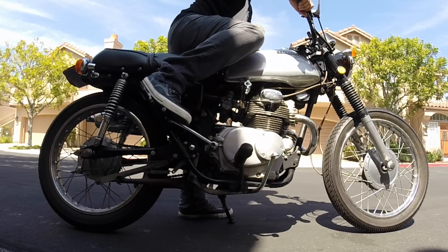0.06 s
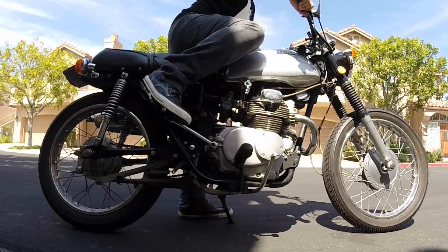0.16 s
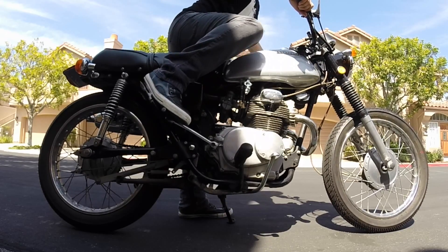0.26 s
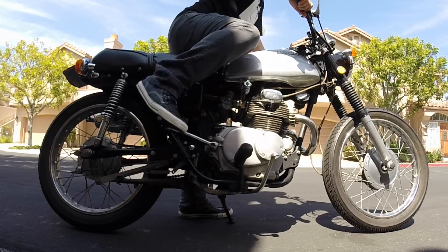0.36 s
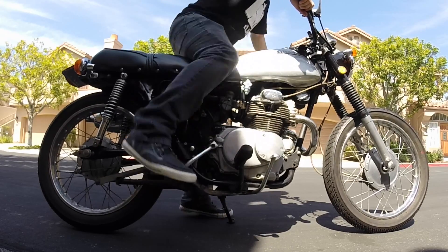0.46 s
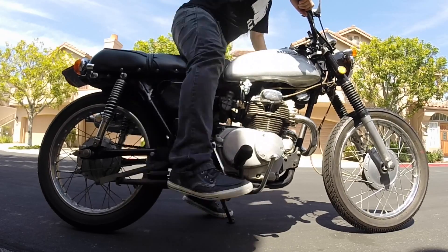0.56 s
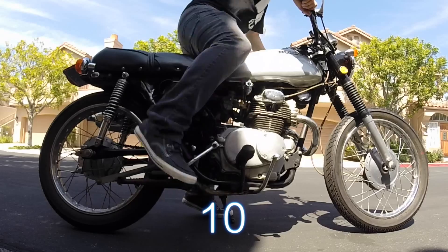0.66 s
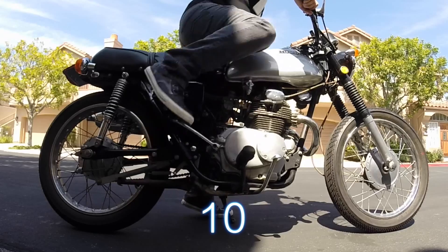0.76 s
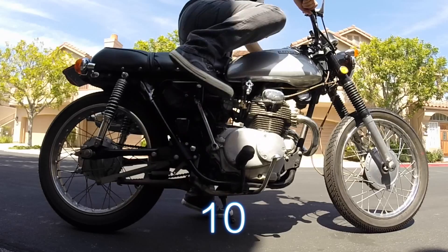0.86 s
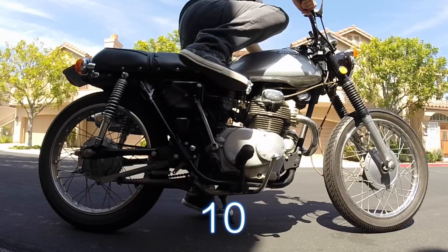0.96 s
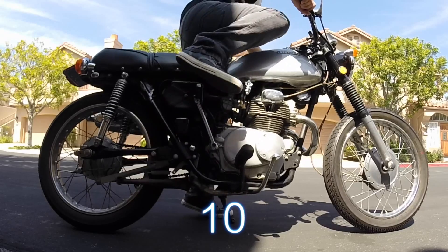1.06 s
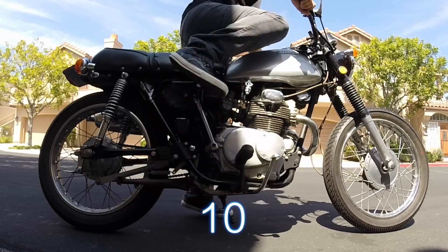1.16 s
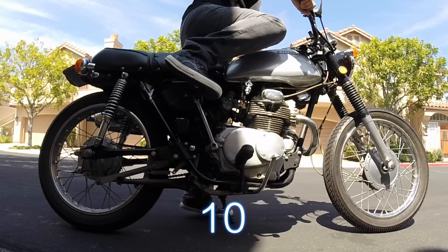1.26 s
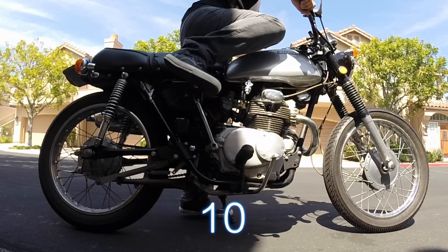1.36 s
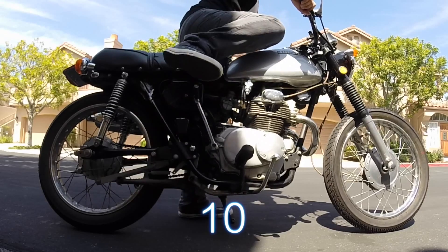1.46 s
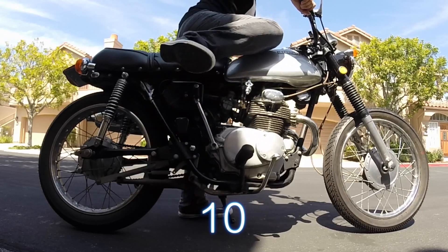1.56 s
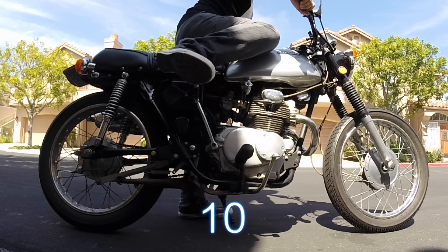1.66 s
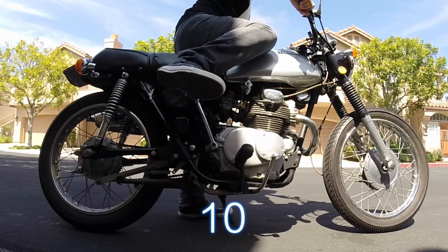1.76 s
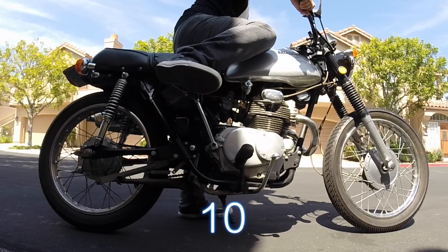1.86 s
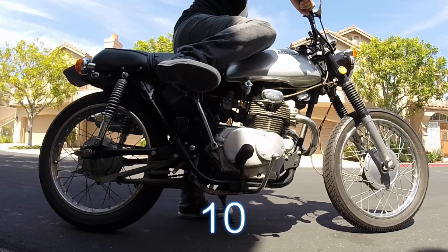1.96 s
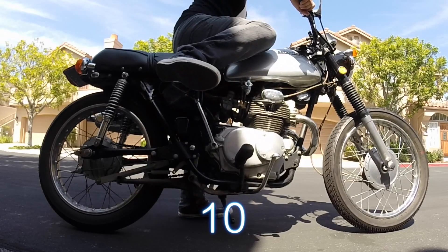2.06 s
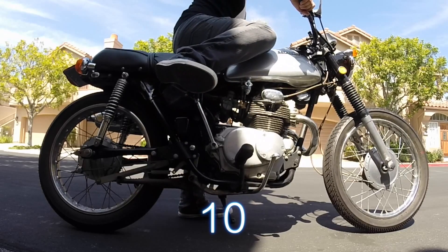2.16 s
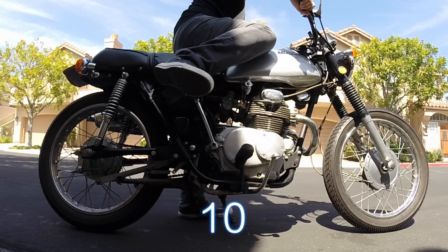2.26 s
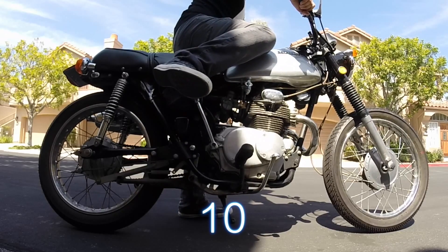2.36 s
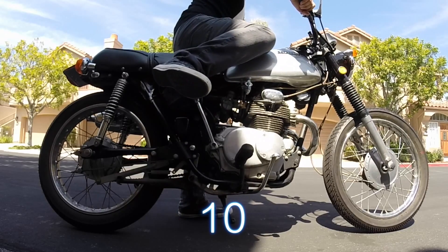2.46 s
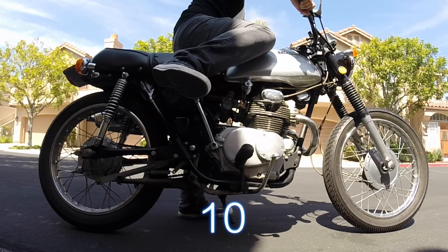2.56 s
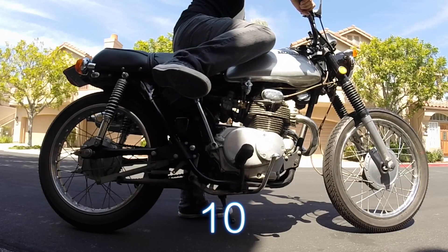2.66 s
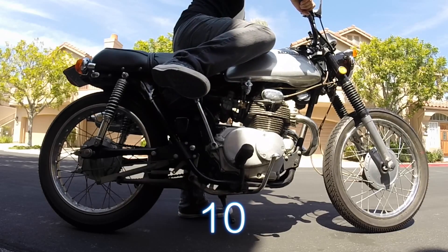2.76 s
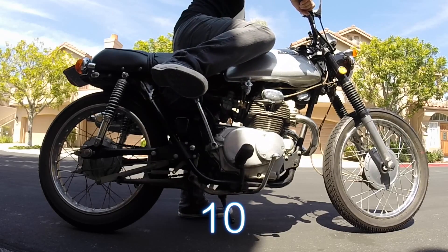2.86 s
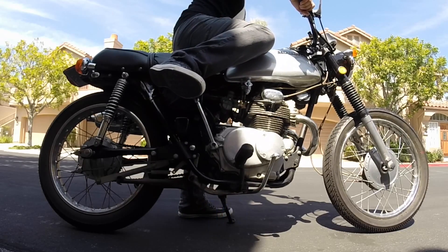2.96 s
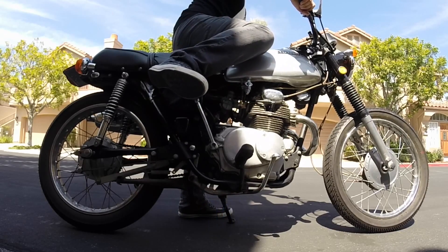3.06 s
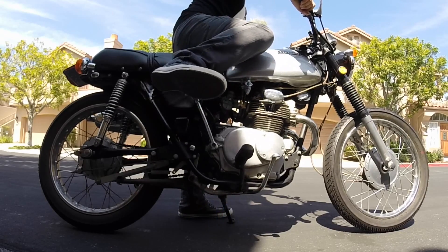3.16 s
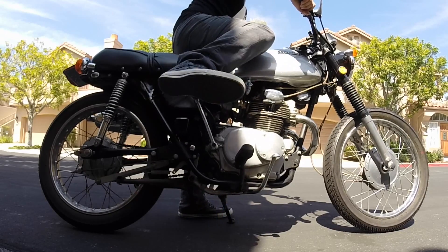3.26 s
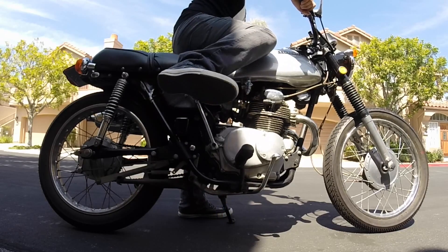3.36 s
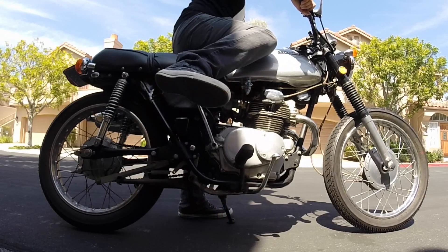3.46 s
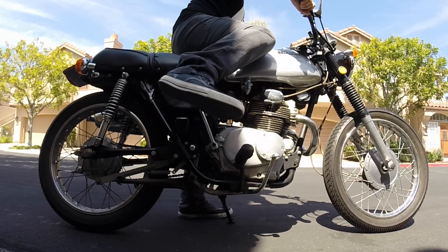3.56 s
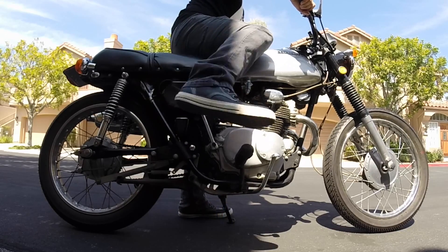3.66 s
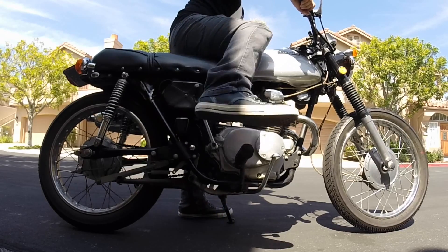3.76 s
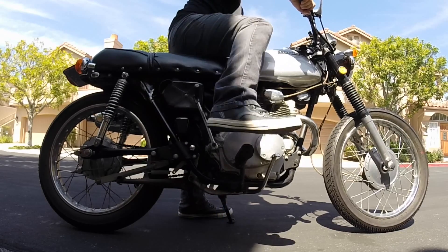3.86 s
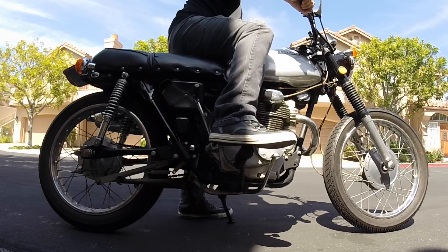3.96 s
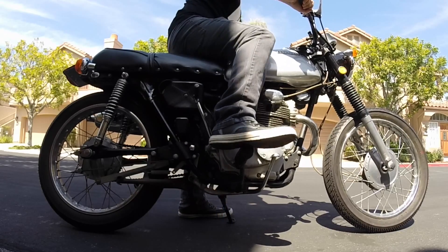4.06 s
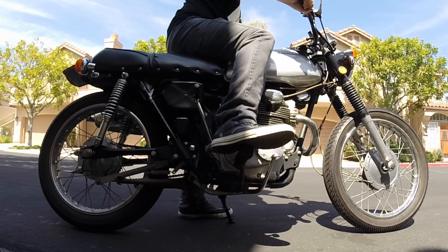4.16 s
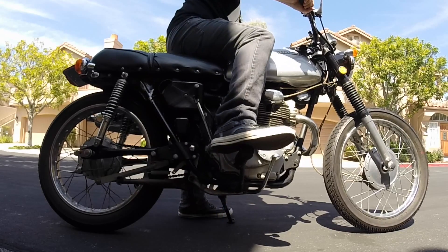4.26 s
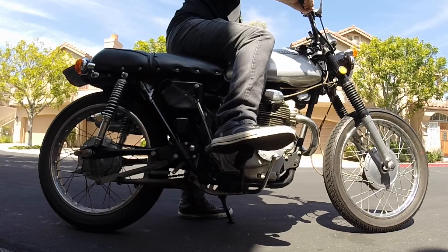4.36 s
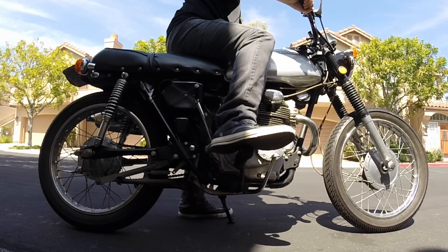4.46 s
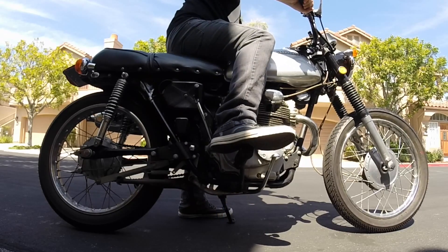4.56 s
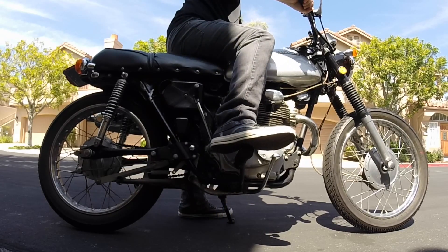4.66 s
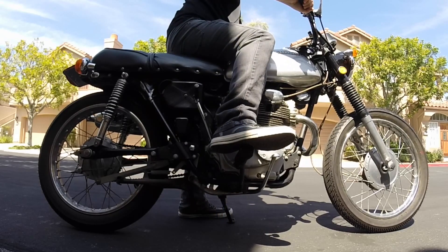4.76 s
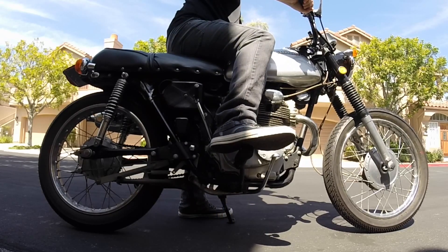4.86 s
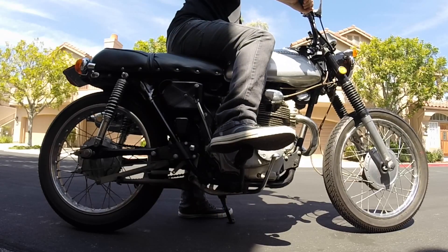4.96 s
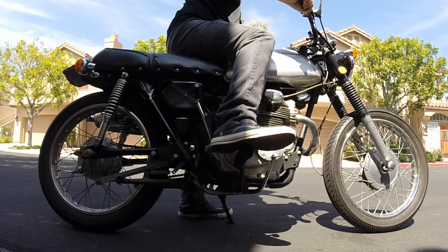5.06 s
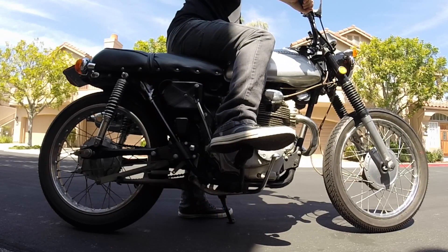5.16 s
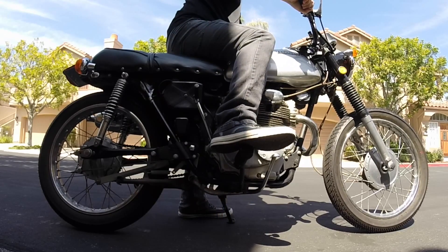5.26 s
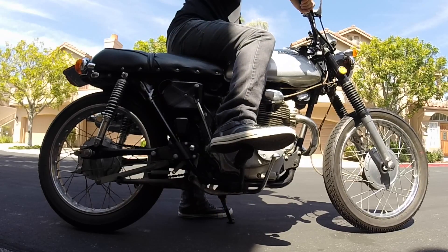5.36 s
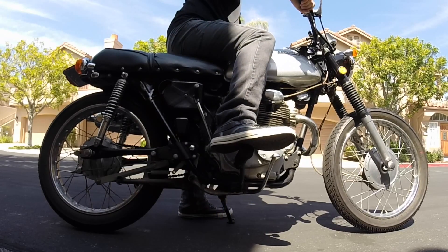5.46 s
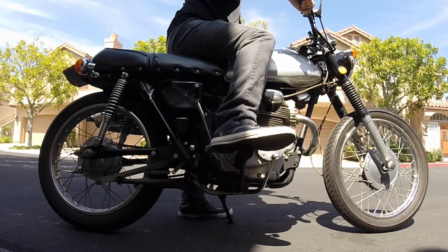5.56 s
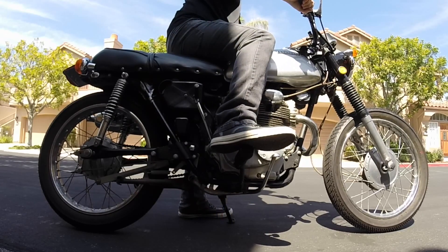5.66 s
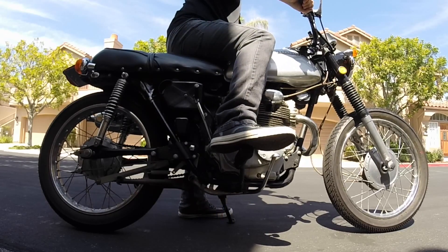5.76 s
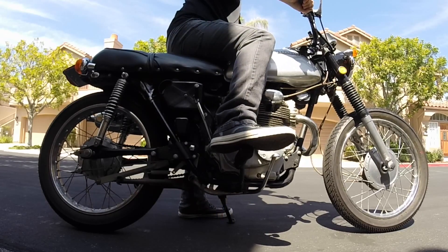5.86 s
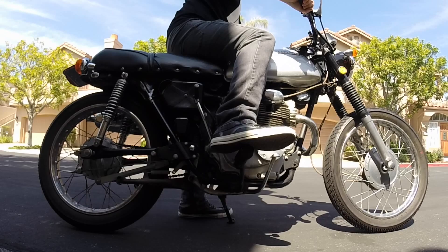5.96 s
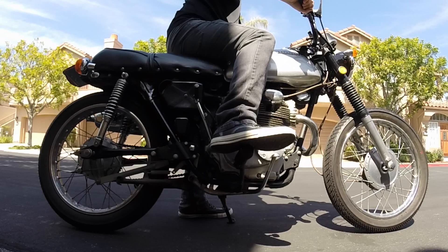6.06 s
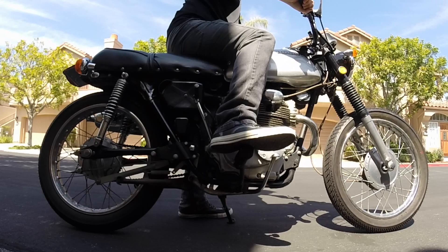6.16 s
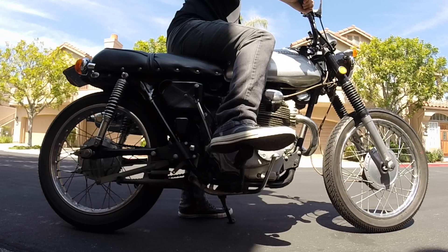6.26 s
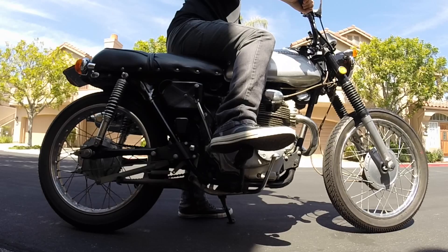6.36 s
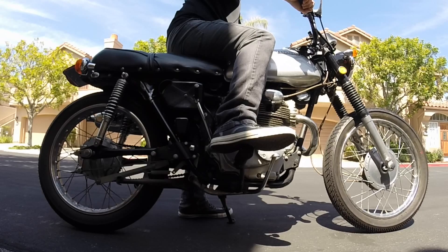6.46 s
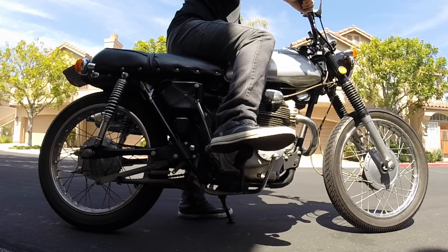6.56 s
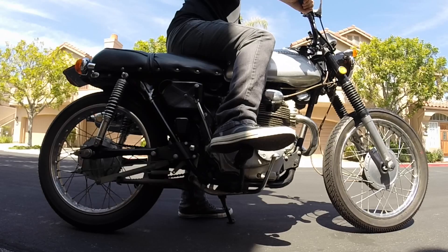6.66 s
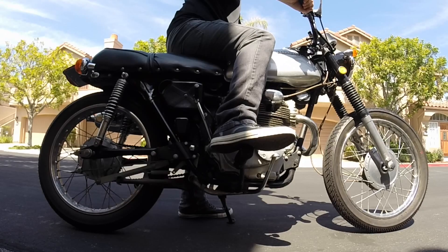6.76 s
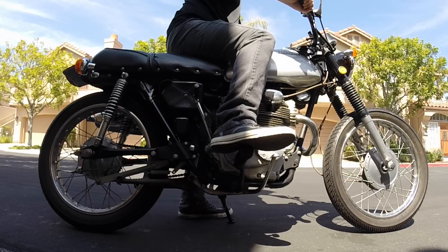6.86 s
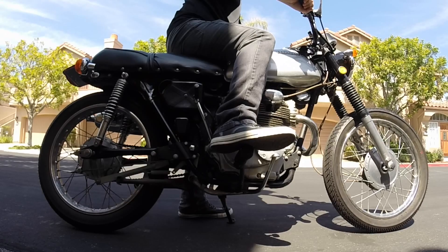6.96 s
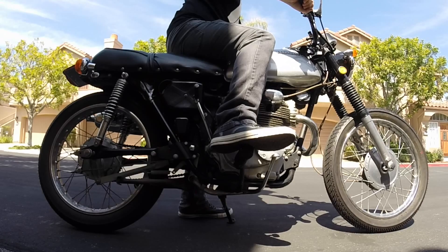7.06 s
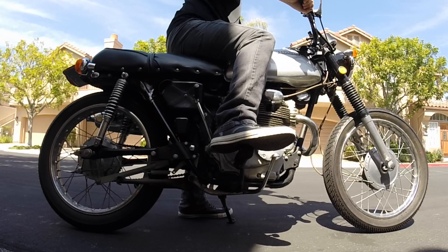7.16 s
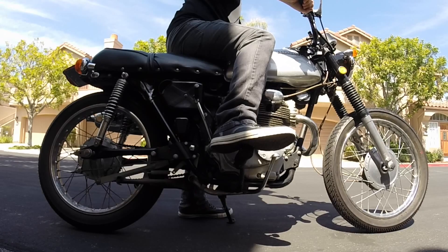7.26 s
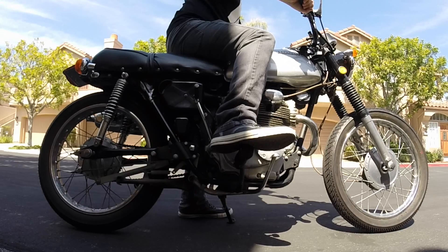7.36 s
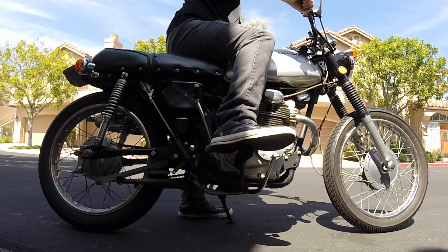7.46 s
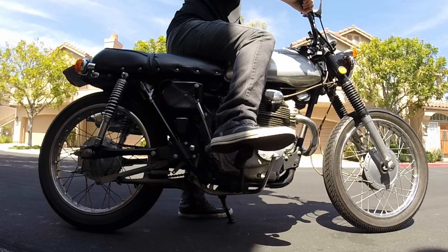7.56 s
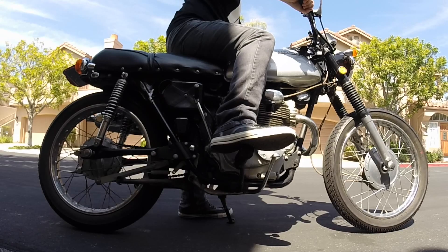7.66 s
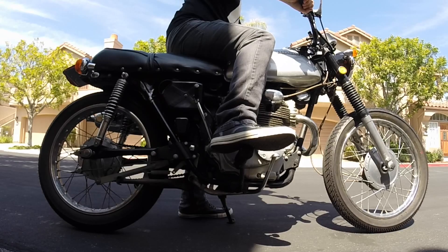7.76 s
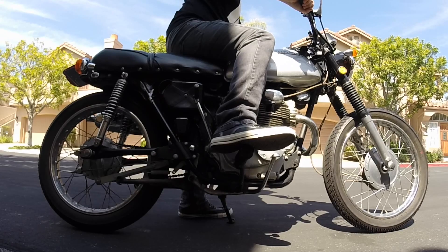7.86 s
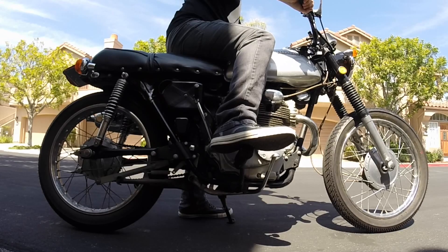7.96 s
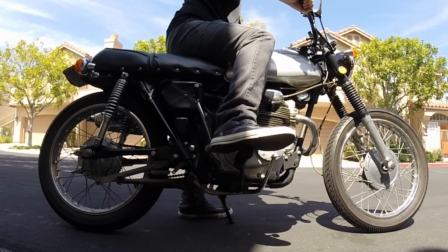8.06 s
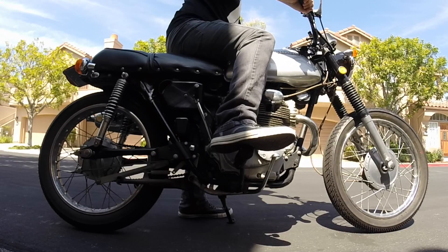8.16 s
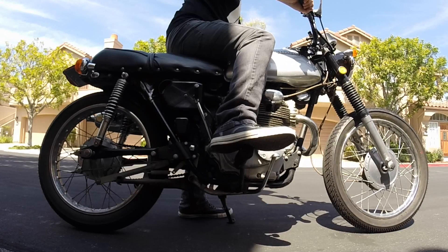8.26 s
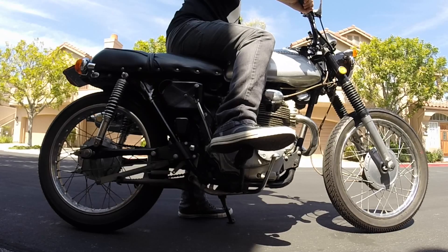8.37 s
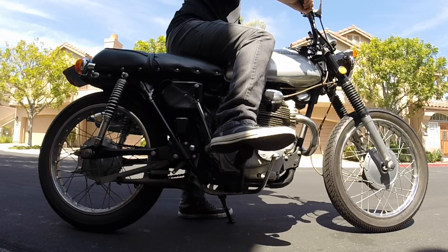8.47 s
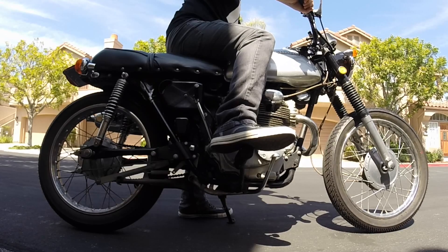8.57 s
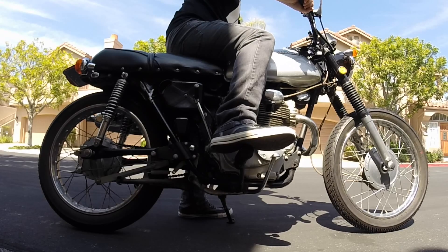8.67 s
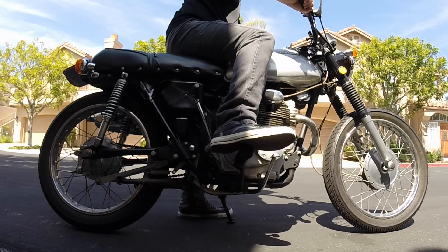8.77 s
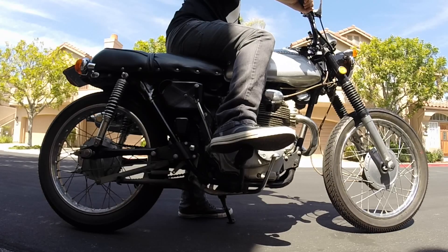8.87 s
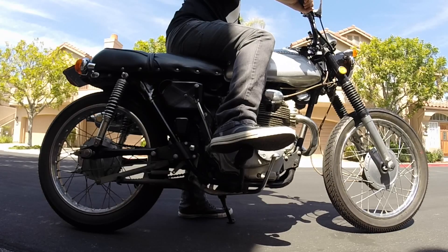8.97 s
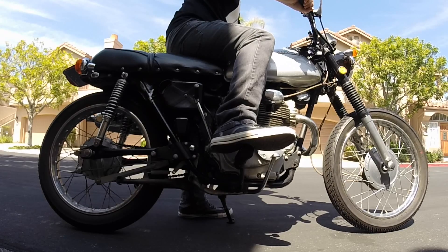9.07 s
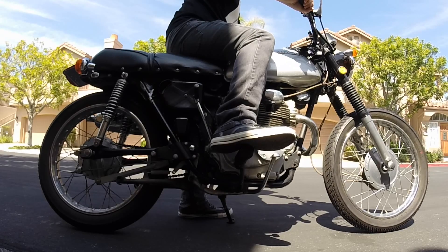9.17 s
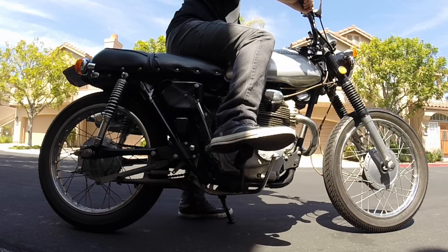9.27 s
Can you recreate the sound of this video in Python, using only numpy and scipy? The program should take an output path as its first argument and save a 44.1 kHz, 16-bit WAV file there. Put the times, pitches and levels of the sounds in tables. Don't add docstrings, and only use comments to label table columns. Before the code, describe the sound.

Close outdoor microphone beside a vintage motorcycle. Half a second of near quiet with light wind, then hard metal clacks from the kick-start and the engine catches. It putters loosely, one cylinder mostly firing alone, with a whirring crankcase, dull knocks and bright tappet ticks. A strong rev blares with raspy exhaust and buzzing metal, sinks to slow idle, and a second, longer, uneven rev carries to the end.

```python
import sys
import numpy as np
from scipy import signal
from scipy.fft import rfft, irfft, next_fast_len
from scipy.io import wavfile
from scipy.ndimage import uniform_filter1d

SR = 44100
rng = np.random.default_rng(int(sys.argv[2]) if len(sys.argv) > 2 else 0)


def wav_record(signal):
    frames = np.transpose(np.atleast_2d(signal))
    bounded = np.clip(frames, -1, 1)
    quanta = np.round(bounded * 32767).astype(np.int16)
    wavfile.write(sys.argv[1], SR, quanta)


def nominal_scale(level):
    x = np.asarray(level, float) / 20
    return 10 ** x


N = 410571


# time in seconds, turns made so far.
CRANK_TURNS = [(0.5201, 0), (0.6718, 2), (1.0607, 9), (2.1848, 28), (2.3902, 31), (2.5476, 33), (3.601, 48),
               (4.3681, 59), (4.5446, 64), (5.3718, 95), (5.5994, 102), (6.3103, 114), (6.5573, 118),
               (6.884, 123), (7.1166, 128), (7.7688, 148), (9.0927, 194), (9.3094, 202)]
FIRING_SPELLS = [(4, 18, .56, .4), (20, 56, .42, .34), (58, 64, .64, .6), (66, 68, .42, .46),
                 (106, 124, .41, .39), (126, 134, .54, .62), (136, 202, .53, .49), (3, 3, .3, .3),
                 (25, 25, .25, .25), (43, 43, .25, .25), (57, 61, .41, .73), (63, 95, .65, .55),
                 (105, 105, .29, .29), (109, 109, .38, .38), (115, 115, .35, .35), (123, 131, .43, .68),
                 (133, 149, .62, .56), (151, 201, .59, .64)]
WEAK_TURNS = [146, 154, 160, 164, 166, 178, 180, 184, 186, 188, 190, 198, 202]
MISSED_TURNS = [150, 170, 196]


def turns():
    seconds, count = np.transpose(CRANK_TURNS)
    turn = np.arange(count[-1] + 1)
    at = smooth(count, seconds, turn)
    gap = np.gradient(at)
    throttle = np.clip((.05 - gap) / .022, 0, 1)
    burn = np.zeros(len(turn))
    for first, last, start, end in FIRING_SPELLS:
        burn[first:last + 1:2] = np.linspace(start, end, (last - first) // 2 + 1)
    burn[WEAK_TURNS] *= 0.51
    burn[MISSED_TURNS] = 0

    previous = np.roll(burn, 1)
    suck = 0.075 + 0.27 * np.maximum(previous - 0.22, 0) * (1 - throttle) * (turn > 0)
    suck = suck + 0.068 * (previous == 0) * (turn > FIRING_SPELLS[0][0])
    return at, gap, np.where(burn > 0, burn, -suck), throttle


# pitch in Hz, share of the blast, time to fade by 60 dB in seconds.
PIPE_A_SHUT = [(65.0, 0.323, 0.179), (116.1, 0.474, 0.223), (164.9, 0.24, 0.067), (199.2, 0.656, 0.081),
               (216.0, -1.0, 0.04), (247.1, 0.394, 0.031)]
PIPE_B_SHUT = [(62.8, 0.056, 0.3), (89.5, 0.161, 0.282), (113.4, 0.737, 0.172), (188.0, 0.222, 0.051),
               (226.4, 0.126, 0.3), (178.9, -0.211, 0.02)]
PIPE_A_OPEN = [(64, .133, .15), (134, .453, .047), (203, .22, .02), (233, .17, .12), (326, .08, .02)]
PIPE_B_OPEN = [(111, .764, .078), (200, -.11, .12), (202, .25, .02), (230, -.12, .12), (264, .3, .055)]
PIPE_B_ALONE = [(113.5, .73, .087), (189, .31, .02), (214, -.4, .07), (263, .43, .05)]
# pitch in Hz, level in dB, time to fade by 60 dB in seconds.
CHAMBERS_SHUT = [(251, -16, 0.062), (310.3, -15.5, 0.11), (361.5, -16, 0.089)]
CHAMBERS_OPEN = [(293, -11, 0.039), (342.5, -17.5, 0.098), (423, -19, 0.081)]


def exhaust():
    at, gap, burn, throttle = turns()
    t = np.arange(-SR // 100, SR // 5) / SR
    opening = 1 / (1 + np.exp(-(t + .003) / .001))

    def ring(modes):
        return opening * sum(share * nominal_scale(-60 * t / t60) * np.cos(2 * np.pi * hz * t)
                             for hz, share, t60 in modes)

    def ring_chambers(chambers):
        return ring([(hz, nominal_scale(db), t60) for hz, db, t60 in chambers])

    shut = [ring(PIPE_A_SHUT), ring(PIPE_B_SHUT)]
    wide = [ring(PIPE_A_OPEN), ring(PIPE_B_OPEN)]
    alone = ring(PIPE_B_ALONE)
    chambers_shut, chambers_open = ring_chambers(CHAMBERS_SHUT), ring_chambers(CHAMBERS_OPEN)
    late = np.clip(t / .008, 0, 1)

    burn = np.where(burn < 0, np.minimum(1.25 * burn, -.09), burn)
    burn = burn * (1 + .05 * rng.standard_normal(len(burn)))
    at = at - (burn < 0) * .15 * np.maximum(gap - .045, 0)

    out = np.zeros(N + SR)
    for k, (s, blast, is_open) in enumerate(zip(at, burn, throttle)):
        cylinder = k % 2
        hot = alone if cylinder and burn[k - 1] < 0 else wide[cylinder]
        wave = (1 - is_open) * shut[cylinder] + is_open * hot
        if blast < 0:
            wave = shut[1]
        chambers = (1 - is_open) * chambers_shut + is_open * chambers_open
        out[round((s + t[0]) * SR):][:len(t)] += blast * (wave + late * chambers)
    return out[:N]


# pitch in Hz, width in Hz, level in dB.
RINGING_METAL = [(1690, 25, -4), (2060, 40, -27), (2777, 12, 19), (2880, 20, 16.5), (3122, 45, 11.5),
                 (4153, 84, 8), (4680, 48, -3), (5180, 52, -1.5), (5030, 61, -8), (6860, 53, -19),
                 (9400, 80, -9), (10490, 130, -39)]
# multiple of its pitch, level in dB.
SHIELD_OVERTONES = [
    (1, -0.5),
    (2, -58),
    (3, -16.5),
    (4, -19),
    (5, -42),
]
# start in seconds, end in seconds, level in dB.
SHIELD_SHAKES = [
    (4.33, 4.533, -24.5),
    (6.96, 7.303, -33),
    (4.555, 5.422, -25),
    (7.36, 7.48, -29),
    (7.56, 7.859, -25),
    (7.896, 8.446, -25.5),
    (8.48, 8.561, -26.5),
    (8.73, 8.822, -25.5),
    (8.88, 9.112, -37),
    (9.16, 9.293, -29.5),
]


def rasp():
    at, gap, burn, throttle = turns()
    edge_s = 0.018
    shake = sum(nominal_scale(db) * ramp(start, edge_s) * (1 - ramp(end, edge_s)) for start, end, db in SHIELD_SHAKES)
    buzzing = shake + nominal_scale(-59.5)
    ringing = nominal_scale(-4) * shake + nominal_scale(-43.5)
    pipe_share = np.where(np.arange(len(at)) % 2, 1, .35)
    size = throttle * np.maximum(burn, 0) * pipe_share
    blasts = bursts(at, size * nominal_scale(rng.standard_normal(len(at))), 0.097, 0.01)

    pitch_hz = 1415 + 22 * noise(lambda hz: hz < 90)
    phase = 2 * np.pi * np.cumsum(pitch_hz) / SR
    buzz = sum(nominal_scale(db) * np.sin(k * phase) for k, db in SHIELD_OVERTONES)
    hiss = noise(colour([(900, -18), (2800, 3), (4300, -14.5), (7000, -19.0), (11000, -29.5), (14500, -39)]))
    metal = noise(resonances(RINGING_METAL)) + 1.12 * hiss
    return blasts * (nominal_scale(13.5) * buzzing * buzz + nominal_scale(10.0) * ringing * metal)


# share of the cycle after A's blast, level in dB, time to fade by 60 dB in seconds.
VALVE_KNOCKS = [
    (.23, -3, 0.13),
    (.64, -18, 0.083),
    (.79, 1.5, 0.074),
    (.87, -3, 0.033),
    (.985, 3, 0.014),
]


def gear():
    t = np.arange(N) / SR
    grip_s = 0.49
    whirr_db = effort("whirr", idle_db=-32.5, doubling_db=5.17, kick_db=0.67)
    whirr_db = whirr_db - 194 * np.maximum(grip_s - t, 0)
    knock_db = effort("knock", idle_db=-40, doubling_db=2.64, kick_db=8)
    slip = slipping_lever(whirr_db, grip_s)

    wander_db = 1.6 * noise(lambda hz: (hz > 1) & (hz < 6))
    knock_db = knock_db + wander_db
    whirr_db = whirr_db + 0.35 * wander_db
    knocks = at_angles(VALVE_KNOCKS, scatter_db=2.2, rise=0.0038, advance=0.12)

    running = np.clip((t - .42) / 0.09, 0, 1)
    turning = np.clip((t - .49) / 0.03, 0, 1)
    engine = whirr(whirr_db, knocks) + valve_knocks(knock_db, knocks) + tappets()
    engine = engine + churning_gas(whirr_db) + throb(whirr_db) + breather()
    return running * slip + turning * engine


def slipping_lever(whirr_db, grip_s):
    grind = noise(resonances([(790, 380, 0.5), (2500, 1400, -25)]))
    return nominal_scale(whirr_db + 5.5) * (1 - ramp(grip_s, 0.09)) * grind


# pitch in Hz, level in dB per Hz.
CASE_TONE = [(210, -27), (350, -7.5), (487, -7), (816, 5), (1480, -12), (1960, -15), (2600, -13.5),
             (4440, -28.5), (4950, -33), (7330, -26.5), (9130, -36.5), (13300, -52), (14800, -69)]


def whirr(whirr_db, knocks):
    return nominal_scale(whirr_db - 2.0) * (1.027 + 0.22 * knocks) * noise(colour(CASE_TONE))


# pitch in Hz, level in dB per Hz.
KNOCK_TONE = [(290, -11), (500, -6), (799, 6.5), (1470, -6), (1950, -15), (2160, -4), (2630, -7.5),
              (4450, -23.5), (4840, -26), (7620, -57), (14800, -79)]
# pitch in Hz, width in Hz, level in dB.
RINGING_FINS = [(2018, 34, 4), (2600, 150, -3.5), (4478, 110, -10), (5160, 120, -19.5), (5770, 27, -25),
                (6360, 58, -11), (6850, 54, -11), (7160, 34, -9.5), (7470, 75, -12.5), (9200, 150, -31),
                (9850, 110, -31.5), (10050, 630, -25.5), (11670, 110, -29.5), (13100, 260, -31)]


def valve_knocks(knock_db, knocks):
    dull = nominal_scale(knock_db - 5.0) * knocks * noise(colour(KNOCK_TONE))
    fins = nominal_scale(knock_db - 7.5) * (0.32 + 0.64 * knocks) * noise(resonances(RINGING_FINS))
    pings = nominal_scale(knock_db - 10.5) * (0.73 + 0.9 * knocks) * clatter(count=1800)
    return dull + fins + pings


def clatter(count):
    place, pitch, size = rng.random((count, 3)).T
    t = np.arange(SR // 40) / SR
    starts = (place * N).astype(int)
    pitches_hz = 1000 * 4 ** pitch
    levels_db = -3 * np.log(size + .05) - 5 * pitch
    out = np.zeros(N + SR)
    for i, hz, db in zip(starts, pitches_hz, levels_db):
        out[i:i + len(t)] += nominal_scale(db - 60 * t / 0.025) * np.sin(2 * np.pi * hz * t)
    return unit(out[:N])


# share of the cycle, level in dB, time to fade by 60 dB in seconds.
TAPPET_TICKS = [
    (.24, 27, 0.021),
    (.82, -18, 0.02),
]
# pitch in Hz, level in dB per Hz.
TICK_TONE = [(3000, -19), (5500, -5), (6500, 3), (7300, 3), (7900, -2.5), (9000, -15), (13000, -48)]


def tappets():
    tick_db = effort("tick", idle_db=-41.5, doubling_db=1.5, kick_db=12)
    ticks = at_angles(TAPPET_TICKS, scatter_db=1.5, rise=0.0014, advance=0.12)
    return nominal_scale(tick_db - 15.5) * ticks * noise(colour(TICK_TONE))


# pitch in Hz, level in dB per Hz.
RUMBLE_TONE = [(15, -51), (35, -0.5), (100, -4.5), (150, -0.5), (240, -1.5), (350, -12.5), (500, -29),
               (700, -57)]


def churning_gas(whirr_db):
    rumble_db = effort("churn", idle_db=-6, doubling_db=-1.5, kick_db=-3)
    at = turns()[0]
    churn = unit(.15 + bursts(at, np.ones(len(at)), .2, .004))
    rumble = .8 * pumping() + .3 * noise(colour(RUMBLE_TONE))
    return nominal_scale(whirr_db + rumble_db + 1.5) * rumble * churn


def pumping():
    at = turns()[0]
    t = np.arange(0, N, 16) / SR
    cycles = uniform_filter1d(np.interp(t, at, np.arange(len(at)) / 2), 80)
    rate_hz = np.gradient(cycles, t)
    order = np.arange(2, 64)[:, None]
    order_db = 1.9 * rng.standard_normal(order.shape) - 2.1 * (order % 2) + 0.93 * (order == 2)
    gain = colour(RUMBLE_TONE)(order * rate_hz) * np.sqrt(rate_hz) * nominal_scale(order_db)
    wave = np.sum(gain * np.sin(2 * np.pi * (order * cycles + rng.random(order.shape))), 0)
    wave /= np.sqrt(np.sum(gain ** 2, 0) / 2 + 1e-9)
    return signal.resample_poly(wave, 16, 1)[:N]


# share of the cycle, level in dB, time to fade by 60 dB in seconds.
CASE_BOOMS = [
    (.29, 0.5, 0.11),
    (.79, 1.5, 0.09),
]


def throb(whirr_db):
    booms = at_angles(CASE_BOOMS, scatter_db=2.2, rise=0.0013, advance=0.12)
    hollow = noise(resonances([(788, 57, 6.5), (977, 24, -14.5), (639, 55, 2.5)]))
    return nominal_scale(whirr_db - 11.5) * booms * hollow


# share of the cycle, level in dB, time to fade by 60 dB in seconds.
BREATHER_PUFFS = [
    (.21, 2, 0.1),
    (.74, 3, .12),
    (.86, -1, .1),
]


def breather():
    puff_db = effort("puff", idle_db=-73.5, doubling_db=11, kick_db=3)
    puffs = at_angles(BREATHER_PUFFS, scatter_db=4.5, rise=0.001, advance=0.042)
    return nominal_scale(puff_db) * puffs * noise(resonances([(10470, 170, -16), (9850, 130, -22)]))


# time in seconds, peak in dB, bright part in dB over the peak.
LEVER_BLOWS = [
    (0.433, -48, -18),
    (0.506, -34.5, -40),
    (0.545, -21.5, -25),
    (0.574, -29, -9),
    (0.644, -28.5, -6.5),
    (0.682, -42, 3),
    (0.714, -19.5, -16),
    (0.927, -20, -15),
    (0.529, -27.5, -25),
]
# time in seconds, peak in dB, bright part in dB over the peak.
STRAY_KNOCKS = [(2.443, -24.5, -22), (3.751, -26.5, -16), (2.593, -25, -30), (2.883, -51, -17),
                (3.02, -23.5, -33), (3.878, -22, -38), (4.022, -26.5, -14), (4.087, -25.5, -37),
                (4.294, -23, -32), (4.352, -15.5, -18), (4.39, -22, -27), (5.67, -60, -14),
                (6.026, -24.5, -41), (6.153, -39, -28), (6.348, -26, -31), (6.593, -41, -26),
                (6.864, -25.5, -22), (6.969, -23, -20), (7.243, -23, -27), (7.954, -37, -19),
                (8.185, -33, -27), (8.386, -25, -8), (8.68, -18, -26), (9.153, -35, -21), (9.184, -20, -27),
                (9.218, -30, -21)]


def blows():
    seconds, db, bright_db = np.transpose(LEVER_BLOWS + STRAY_KNOCKS)
    dull = bursts(seconds, nominal_scale(db), 0.072, 0.00028) * noise(colour(KNOCK_TONE))
    bright = bursts(seconds, nominal_scale(db + bright_db), 0.029, 0.0011) * noise(colour(TICK_TONE))
    return dull + nominal_scale(-0.5) * bright


# time in seconds, level in dB.
WIND_GUSTS = [
    (0.0, -66),
    (.23, -41),
    (.3, -37.5),
    (.36, -46),
]
# pitch in Hz, level in dB per Hz.
WIND_TONE = [(12, -24), (22, -3), (50, 2.5), (120, -11), (400, -84)]
# pitch in Hz, level in dB per Hz.
STREET_TONE = [(12, -23), (20, -13.5), (50, -16), (139, -5), (318, -22.5), (408, -21.5), (1100, -27),
               (1720, -33.5), (3940, -39.5), (12600, -56), (14800, -58)]


def street():
    t = np.arange(N) / SR
    gust_s = 0.031
    air = nominal_scale(-50 + 6.0) + sum(nominal_scale(db + 1.5) * np.exp(-((t - s) / gust_s) ** 2) for s, db in WIND_GUSTS)
    road = nominal_scale(effort("road", idle_db=-33, doubling_db=2.5, kick_db=1.7)) * ramp(0.5, 0.07)
    return (air + road) * noise(colour(WIND_TONE)) + nominal_scale(-48.0) * noise(colour(STREET_TONE))


LOAD_ANSWER = {"whirr": 3, "knock": -1.5, "tick": -8, "churn": 3, "puff": 8.5, "road": -26}


def effort(part, idle_db, doubling_db, kick_db):
    at, gap, burn = turns()[:3]
    load = uniform_filter1d(np.maximum(burn, 0), 5)
    doublings = np.log2(1 / (gap * 14))
    per_turn = idle_db + doubling_db * doublings + LOAD_ANSWER[part] * (load - .2)
    return np.interp(np.arange(N) / SR, at, per_turn) - kick_db * (1 - ramp(0.74, .04))


def at_angles(table, scatter_db, rise, advance):
    at, gap, burn, throttle = turns()
    cycle = np.arange(len(at) // 2)
    shortening = (gap[2 * cycle] / .07) ** 0.73
    env = 0
    for share, db, t60 in table:
        angle = 2 * (cycle + share - advance * throttle[2 * cycle])
        when = np.interp(angle, np.arange(len(at)), at)
        size = nominal_scale(db + scatter_db * np.clip(rng.standard_normal(len(cycle)), -1.6, 1.6))
        env = env + bursts(when, size, t60 * shortening, rise)
    return unit(env)


def bursts(times, gains, t60s, rise):
    env = np.zeros(N + SR)
    t = np.arange(SR // 8) / SR
    for s, gain, t60 in zip(times, gains, np.broadcast_to(t60s, len(times))):
        env[int(s * SR):][:len(t)] += gain * nominal_scale(-60 * t / t60) * (1 - np.exp(-t / rise))
    return env[:N]


def noise(response):
    m = next_fast_len(N)
    spectrum = rfft(rng.standard_normal(m)) * response(np.fft.rfftfreq(m, 1 / SR))
    return unit(irfft(spectrum, m)[:N])


def colour(points):
    f, db = np.transpose(points)
    return lambda hz: nominal_scale(np.interp(np.log(hz + 1), np.log(f), db))


def resonances(modes):
    return lambda hz: sum(nominal_scale(db) / (1 + (2 * (hz - centre) / width) ** 2) for centre, width, db in modes)


def unit(x):
    return x / np.sqrt(np.mean(x ** 2) + 1e-20)


def ramp(s, length):
    return np.clip((np.arange(N) / SR - s) / length + .5, 0, 1)


def smooth(x, y, at):
    def basis(u):
        return np.c_[np.abs(u[:, None] - x) ** 3, np.ones(len(u)), u]

    ends = np.c_[[np.ones(len(x)), x], np.zeros((2, 2))]
    return basis(at) @ np.linalg.solve(np.r_[basis(x), ends], np.r_[y, 0, 0])


def scene():
    return (exhaust() + gear() + rasp() + blows() + street())[None]


def low_pass(x):
    return signal.sosfilt(signal.butter(12, 15000, fs=SR, output="sos"), x)


def record(dry):
    x = signal.sosfiltfilt(signal.butter(2, 22, "high", fs=SR, output="sos"), dry)
    x = signal.sosfilt(signal.butter(8, 14800, fs=SR, output="sos"), x)
    x = x / (1 + np.abs(x / .95) ** 5) ** (1 / 5)
    return low_pass(x)


dry = scene()
out = record(dry)
wav_record(out)
```